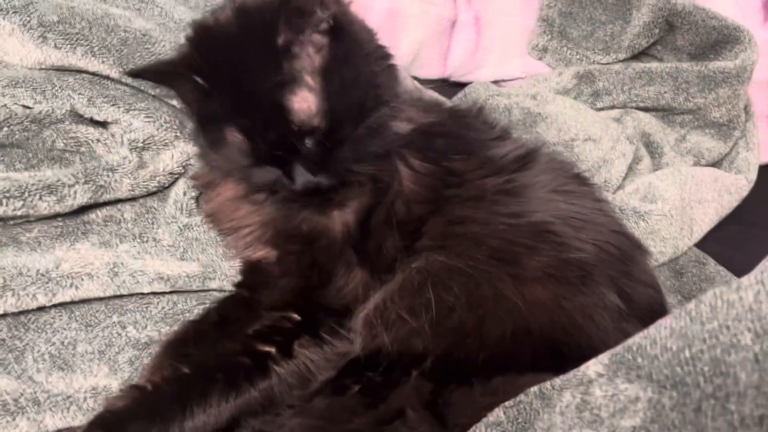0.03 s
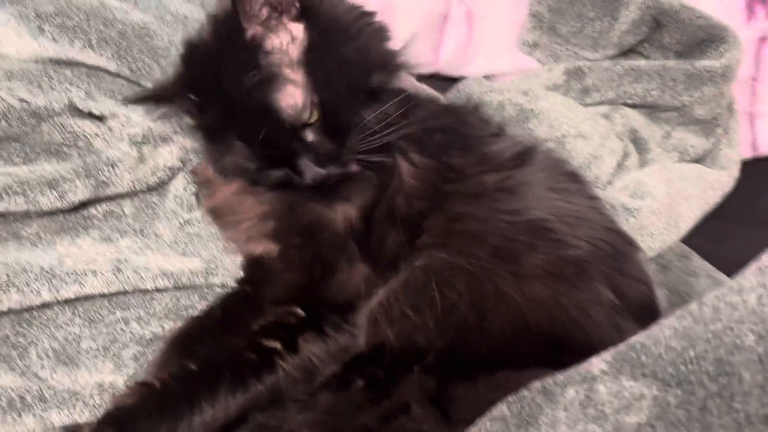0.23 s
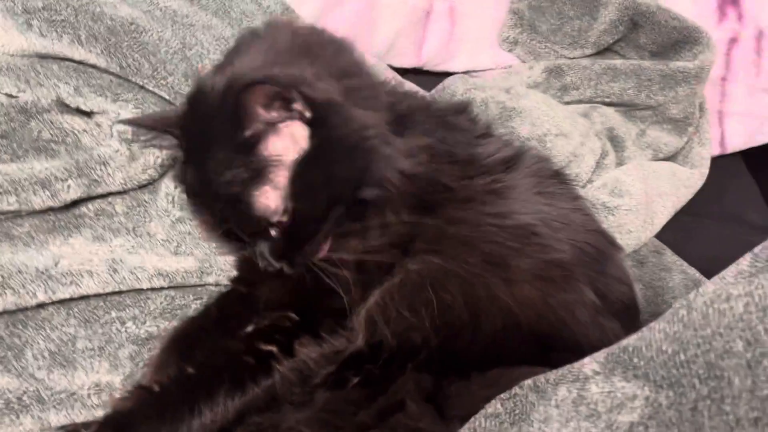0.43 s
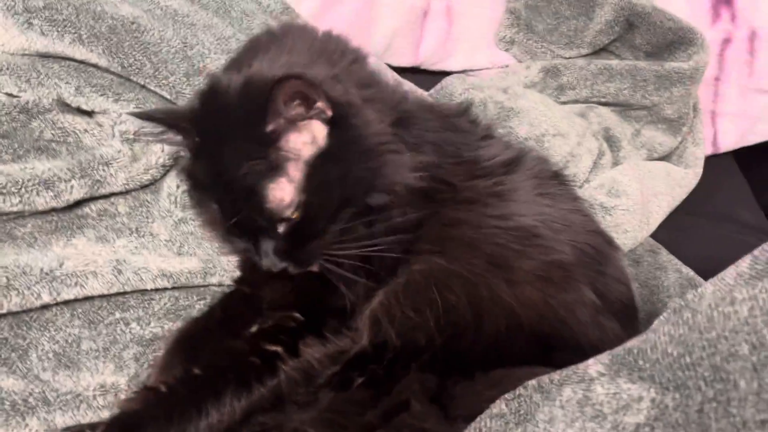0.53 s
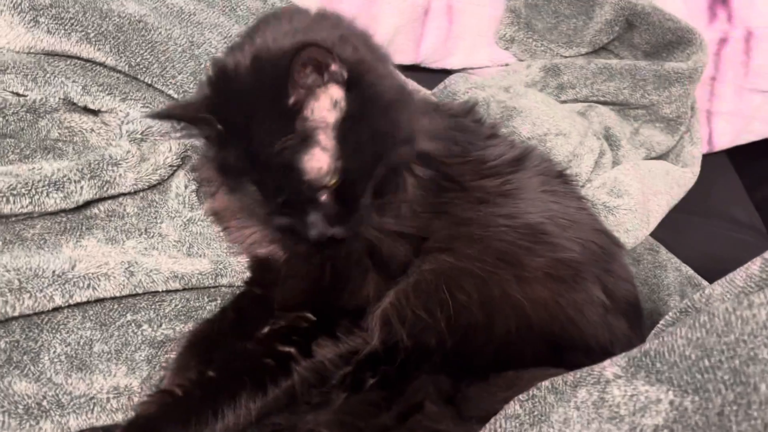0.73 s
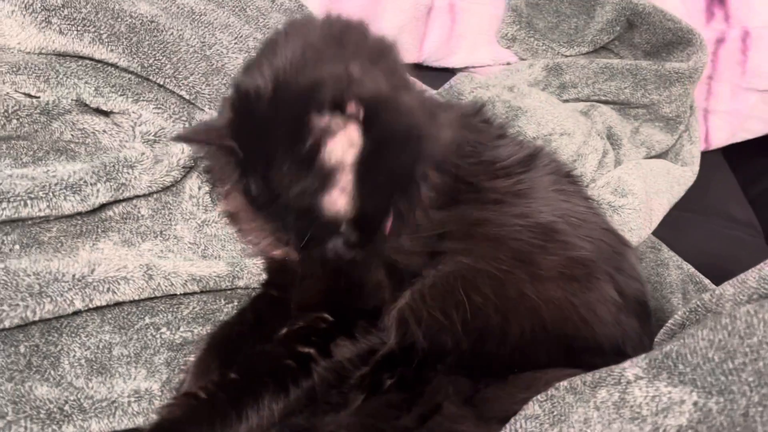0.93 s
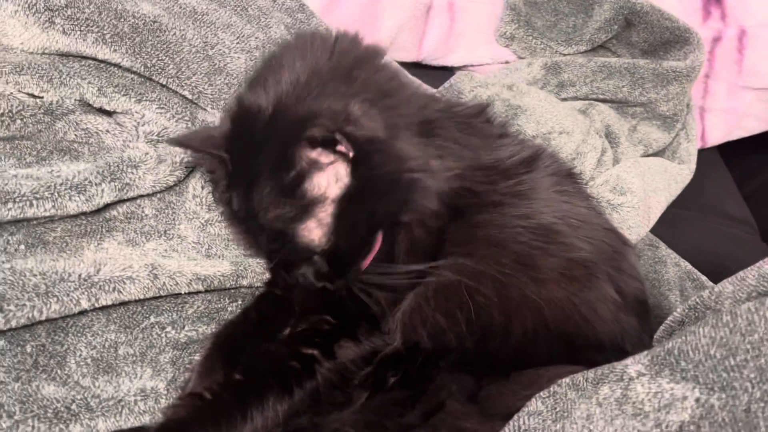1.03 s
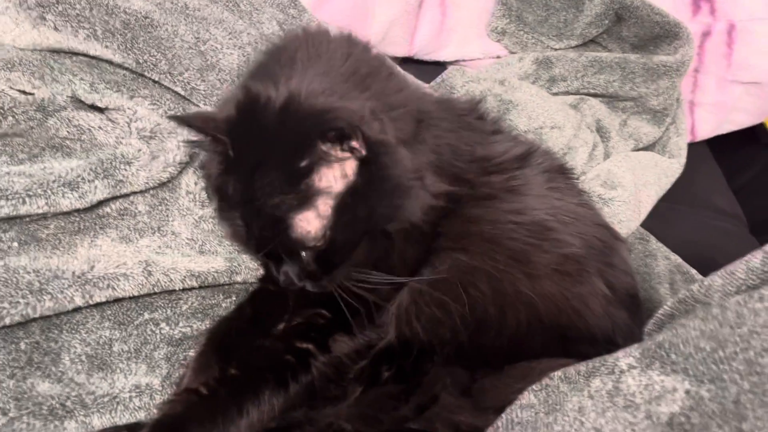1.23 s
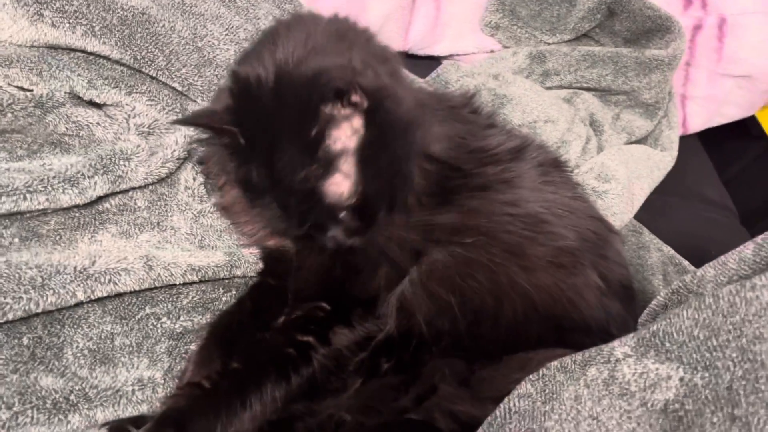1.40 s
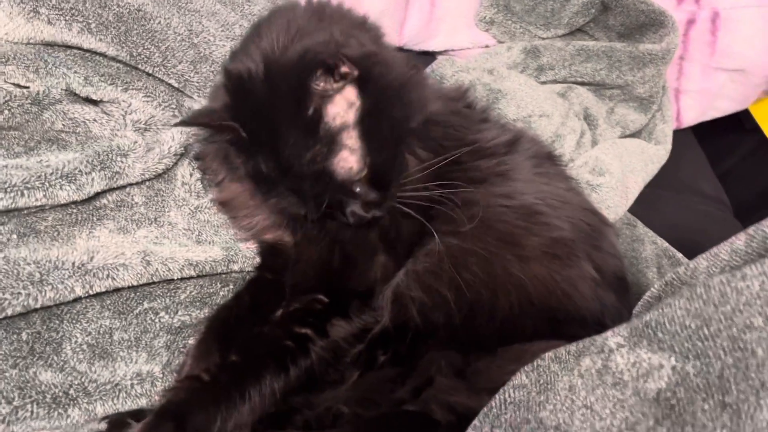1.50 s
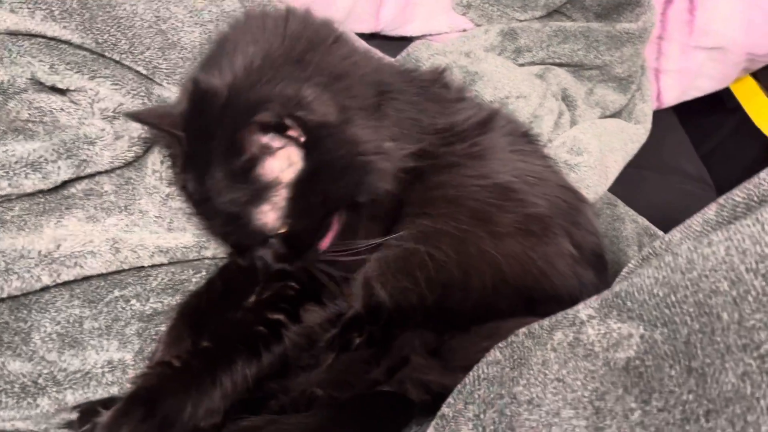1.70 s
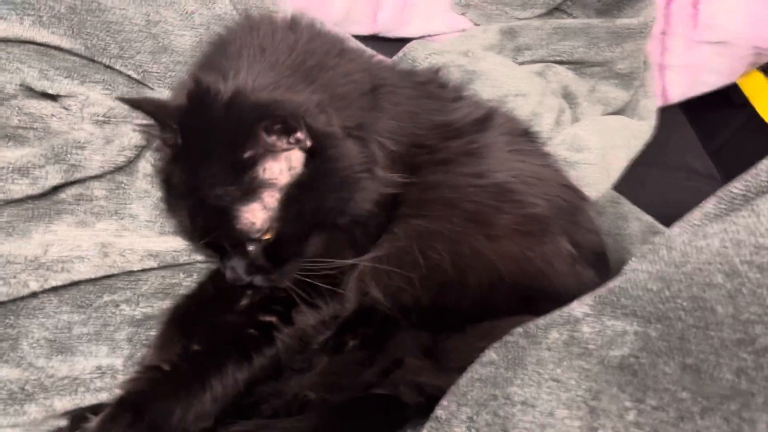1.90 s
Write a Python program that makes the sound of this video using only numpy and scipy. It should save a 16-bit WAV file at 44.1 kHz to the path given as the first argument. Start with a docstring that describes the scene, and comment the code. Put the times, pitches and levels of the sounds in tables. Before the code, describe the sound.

A cat licks its fur on a blanket in a quiet room. Dull handling thuds bump the close microphone at first, as two soft rasping tongue strokes begin. Small wet mouth ticks and a brief crackle follow.

```python
"""A cat grooming on fleece

In a quiet room, close to a hand-held camera, a cat licks its fur. Friction makes most of the sound:
two long tongue strokes rasp over a soft rub of fur on blanket, each a dense train of tiny slips.
Small wet ticks and a short stick-slip crackle follow. Early on the hand shifts on the camera,
whose body conducts the thuds and rumble to the microphones."""
import sys
import numpy as np
from scipy import signal
from scipy.fft import rfft, irfft
from scipy.io import wavfile

SR = 44100
rng = np.random.default_rng(int(sys.argv[2]) if len(sys.argv) > 2 else 0)


def to_wav(s):
    """Save 16-bit WAV."""
    ch = np.atleast_2d(s).T  # columns
    pcm = np.round(np.clip(ch, -1, 1) * 32767)  # PCM
    wavfile.write(sys.argv[1], SR, pcm.astype(np.int16))


N = 85995


def amp(db):
    """Converts decibels to an amplitude ratio."""
    return 10 ** (np.asarray(db) / 20)


def unit(x):
    """Normalises to rms 1."""
    return x / np.sqrt(np.mean(x ** 2) + 1e-20)


def envelope(points, column=1):
    """Amplitude envelope, interpolated in dB between points in time."""
    points = np.array(points)
    return amp(np.interp(np.arange(N) / SR, points[:, 0], points[:, column]))


def colour(x, spectrum):
    """Spectral shaping by a curve in dB over log frequency; the result has rms 1."""
    hz, db = np.transpose(spectrum)
    log_hz = np.log(np.fft.rfftfreq(N, 1 / SR) + 1)
    return unit(irfft(rfft(x) * amp(np.interp(log_hz, np.log(hz), db)), N))


def add(mix, start_s, sound):
    """Superposition: adds a stereo sound to the mix."""
    part = mix[:, max(round(start_s * SR), 0):][:, :sound.shape[1]]
    part += sound[:, :part.shape[1]]


def friction(per_s=5000, spread_db=1.5, shared=0.19, lag_s=0.00044):
    """Shot noise of tiny slips; a share of its power is common to both sides, lagging on the right."""
    slips = rng.standard_normal((3, N)) * (rng.random((3, N)) < per_s / SR)
    slips *= amp(spread_db * np.minimum(rng.exponential(1, (3, N)), 4))
    common = np.array([slips[0], np.roll(slips[0], round(lag_s * SR))])
    return np.sqrt(shared) * common + np.sqrt(1 - shared) * slips[1:]


def swish(noise, peak_s, half_s, db, centre_hz, half_oct):
    """Band-limited noise, Gaussian in both time and log frequency."""
    t, hz = np.arange(N) / SR, np.fft.rfftfreq(N, 1 / SR) + 1
    band = np.exp(-0.5 * (np.log2(hz / centre_hz) / half_oct) ** 2)
    swell = np.exp(-0.5 * ((t - peak_s) / half_s) ** 2)
    return amp(db) * swell * unit(irfft(rfft(noise) * band, N))


def chirp(middle_hz, length_s, fall_oct):
    """Dispersion: highs arrive before lows, so the pitch falls. A complex pulse of random phase."""
    progress = np.arange(0, length_s, 1 / SR) / length_s
    hz = middle_hz * 2 ** (fall_oct * (0.5 - progress))
    cycles = np.cumsum(hz) / SR + rng.random()
    return np.sin(np.pi * progress ** 1.02) ** 2 * np.exp(2j * np.pi * cycles)


def snap(hz, length_s, fizz_db):
    """A wet transient: a falling chirp, leading in phase on the left, with a soft fizz."""
    pulse = chirp(hz, length_s, fall_oct=3.27)
    tone = pulse.real + 0.45 * np.array([-pulse.imag, pulse.imag])
    lowpass = signal.butter(4, 7450, fs=SR, output="sos")
    fizz = unit(signal.sosfilt(lowpass, rng.standard_normal((2, len(pulse)))))
    return tone + amp(fizz_db) * abs(pulse) * fizz


# Rumble of the hand's grip. Each row: time in seconds, level in dB.
GRIP_LEVELS = [(0, -67.5), (.21, -63), (.25, -44.5), (.39, -40.5), (.45, -48.5), (.52, -52.5), (.56, -59.5),
               (.7, -65), (.76, -84), (1.0, -92), (1.1, -73), (1.22, -86), (1.48, -76), (1.58, -63.5),
               (1.68, -75), (1.85, -75), (1.95, -66)]
# Its spectrum. Each row: frequency in Hz, relative density in dB.
GRIP_SPECTRUM = [(15, -34), (42, -2), (62, 2.5), (110, -5), (200, -12), (350, -22), (600, -42), (2000, -73)]
# Dull thuds. Each row: start in seconds, peak in dB, middle pitch in Hz, length in seconds.
THUDS = [(0.223, -34.5, 84.2, 0.025), (.242, -28, 80.3, 0.027), (0.261, -31, 78.5, 0.024),
         (0.286, -34, 130, 0.014), (0.297, -33.5, 271, 0.015), (.3, -27.5, 84, 0.021),
         (.323, -31, 229.5, 0.0135), (.318, -24.5, 77.5, 0.032), (0.35, -25, 144.3, 0.035),
         (.366, -37, 321, 0.0098), (.377, -27, 76, .024), (0.399, -31.5, 67.5, 0.035),
         (0.464, -37.5, 113, 0.029), (0.483, -35.5, 62.5, 0.039), (.585, -51, 101, 0.022),
         (0.663, -56, 70.3, 0.028), (1.06, -54.5, 86, 0.024), (1.274, -60, 76, 0.024),
         (1.543, -51, 101, 0.024), (1.887, -51, 78, 0.038), (1.938, -50, 120, .012)]


def handling():
    """Structure-borne sound: rumble, a finger's scuff and thuds travel through the camera body."""
    rumble = colour(friction(per_s=1500, spread_db=1, shared=0.85), GRIP_SPECTRUM)
    finger = friction(shared=0.85, lag_s=0)
    scuff = swish(finger, peak_s=0.396, half_s=0.011, db=-45.5, centre_hz=277, half_oct=0.44)
    out = envelope(GRIP_LEVELS) * rumble + scuff
    for start_s, db, hz, length_s in THUDS:
        thud = chirp(hz, length_s, fall_oct=1.28)
        side = amp(-9.5) * np.array([thud.imag, -thud.imag])
        add(out, start_s, amp(db) * (thud.real + side))
    return out


# A soft rub. Each row: time in seconds, then levels of lows, mids and treble in dB.
RUB_LEVELS = [(0, -63.5, -69.5, -79), (.13, -63, -68, -78), (.22, -63, -64, -72), (.32, -66, -59.5, -70.5),
              (.43, -64, -64, -69), (.68, -76.5, -68.5, -71.5), (.85, -69.5, -65.5, -69.5),
              (1.0, -68, -66, -65.5), (1.17, -61.5, -64, -68), (1.28, -66.5, -66, -68.5),
              (1.44, -66.5, -64, -64.5), (1.57, -58.5, -59, -65.5), (1.61, -79, -66.5, -68.5),
              (1.72, -68, -66.5, -68.5), (1.82, -79.5, -65, -68.5), (1.89, -73, -59.5, -64.5),
              (1.95, -72, -57.5, -61.5)]
# Lows and mids of fur on fleece. Each row: frequency in Hz, relative density in dB.
RUB_LOWS = [(40, -7.5), (200, -1.5), (480, 1), (800, -5.5), (1200, -5), (2000, -11), (5000, -41)]
RUB_MIDS = [(300, -12.5), (900, -3), (1600, -4), (2000, -8), (2400, -3.5), (3200, -5), (4300, -7.5),
            (6000, -9.5), (12000, -69)]
# Treble hiss, with the same columns. The dip near 12.5 kHz and the rise above it are not the fur's.
TREBLE_HISS = [(1000, -10.5), (3500, -8.5), (5600, -6), (7400, -2), (8700, -4), (10800, -6), (12500, -23.5),
               (16000, -6)]


def blanket():
    """Sliding friction of fur on fleece gives fine-grained broadband noise, from one side."""
    return sum(envelope(RUB_LEVELS, column) * colour(friction(), spectrum)
               for column, spectrum in enumerate([RUB_LOWS, RUB_MIDS, TREBLE_HISS], start=1))


# Brief bands of noise. Each row: peak time and half length in seconds, level in dB,
# centre in Hz, half width in octaves.
NOISE_BANDS = [(.31, 0.072, -69.5, 5370, .25), (0.522, 0.036, -62.5, 2860, 0.63),
               (.531, 0.052, -75, 5740, .22), (.96, 0.035, -70, 5600, 0.36),
               (1.16, 0.077, -68.5, 5600, 0.23), (1.36, 0.052, -71, 7250, 0.15),
               (1.57, 0.013, -61, 600, 1.6), (1.892, .032, -61.5, 3460, 0.4)]


def noise_bands():
    """Band-limited friction noise: fur swishes, the first lick's bright rasp, the crackle's low body."""
    return sum(swish(friction(), *row) for row in NOISE_BANDS)


# Wet ticks. Each row: start in seconds, peak in dB, middle pitch in Hz, length in seconds.
TICKS = [(1.2005, -46.5, 720, 0.0024), (1.314, -52, 597, 0.0041), (1.404, -50.5, 696, 0.0036),
         (1.436, -54.5, 702, 0.006), (1.452, -50, 2180, 0.0021), (1.4526, -53, 598, 0.0063),
         (1.5, -45, 1270, 0.0024), (1.515, -48, 1080, 0.0036), (1.5432, -49.5, 2200, 0.00283),
         (1.58, -51.5, 1415, .003), (1.6981, -47.5, 1727, 0.00198), (1.6984, -43.5, 900, 0.00302),
         (1.9304, -47, 3255, 0.0035), (1.9322, -40.5, 606, 0.0045)]


def mouth_ticks():
    """Impulsive excitation: tongue and mouth make wet snaps a few milliseconds long."""
    out = np.zeros((2, N))
    for start_s, db, hz, length_s in TICKS:
        add(out, start_s, amp(db) * snap(hz, length_s, fizz_db=-15.5))
    return out


def tuft_crackle(start_s=1.505, end_s=1.579, growth_db=4.5, scatter_oct=0.49, jitter=0.15):
    """Stick-slip motion: under a growing pull a tuft slips faster and louder, then lets go."""
    out, time_s = np.zeros((2, N)), start_s
    for pitch, gap in rng.standard_normal((30, 2)):
        pull = (time_s - start_s) / (end_s - start_s)
        slip = snap(1072 * 2 ** (scatter_oct * pitch), length_s=0.0028, fizz_db=-5.5)
        if pull < 1:
            add(out, time_s, amp(-51 + growth_db * (pull - 0.5)) * slip)
        slips_per_s = np.interp(pull, [0, 1], [120, 280])
        time_s += np.exp(jitter * gap) / slips_per_s
    return out


# Tongue strokes. Each row: peak time, rise and fall in seconds, level in dB, brightness from 0 to 1.
STROKES = [(.5, 0.2, 0.2, -61, 0.5), (.9, 0.23, 0.19, -61, 0.02)]
# Spectra of a slow and a brisk stroke. Each row: frequency in Hz, relative density in dB.
SLOW_RASP = [(150, -25.5), (450, -6.5), (900, -5), (1300, -0.5), (1630, 3.5), (2050, -7), (2600, -7),
             (4000, -28), (16000, -47)]
BRISK_RASP = [(150, -13), (700, -12), (1100, -10), (1480, 7), (1750, -8), (2000, -5), (3000, 1.5),
              (4500, -2.5), (6500, -46), (16000, -43)]


def tongue():
    """Friction of barbs combing through fur: each stroke swells and fades, brighter when brisk."""
    t, out = np.arange(N) / SR, np.zeros((2, N))
    for peak_s, rise_s, fall_s, db, brightness in STROKES:
        slips = friction(per_s=2500, spread_db=0.5, shared=0.8, lag_s=0)
        brisk, slow = colour(slips, BRISK_RASP), colour(slips, SLOW_RASP)
        rasp = unit(brightness * brisk + (1 - brightness) * slow)
        swell = np.exp(-0.5 * ((t - peak_s) / np.where(t < peak_s, rise_s, fall_s)) ** 2)
        out += amp(db) * swell * rasp
    return out


def scene():
    """Superposition of the cat, its blanket and the hand on the camera."""
    return tongue() + blanket() + noise_bands() + mouth_ticks() + tuft_crackle() + handling()


def record(dry):
    """Band limiting removes the deepest bass and the top of the treble."""
    highpass = signal.butter(4, 36, "highpass", fs=SR, output="sos")
    lowpass = signal.firwin(511, 15850, window=("kaiser", 9), fs=SR)
    return signal.oaconvolve(signal.sosfilt(highpass, dry), lowpass[None], "same")


dry = scene()
out = record(dry)
to_wav(out)
```